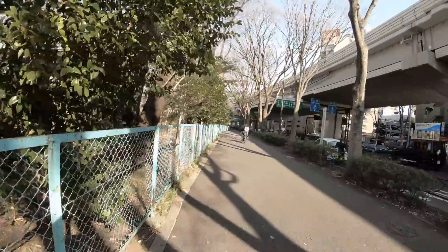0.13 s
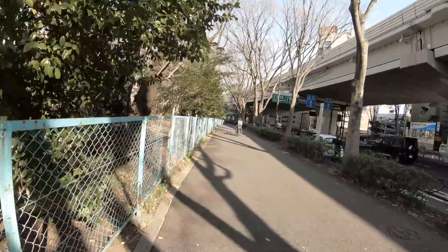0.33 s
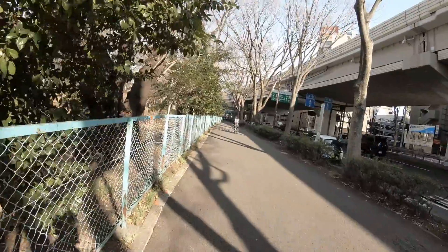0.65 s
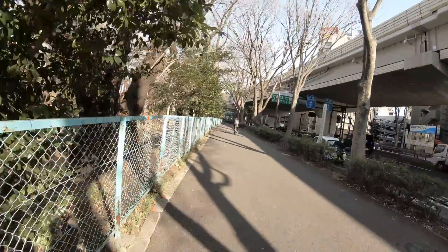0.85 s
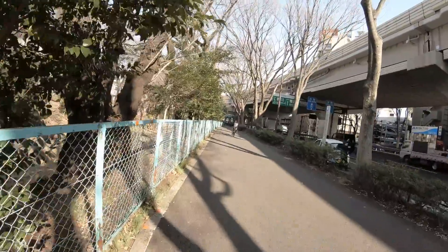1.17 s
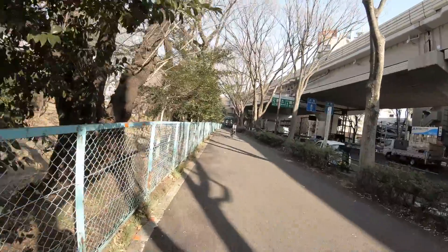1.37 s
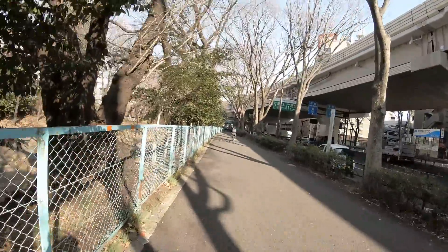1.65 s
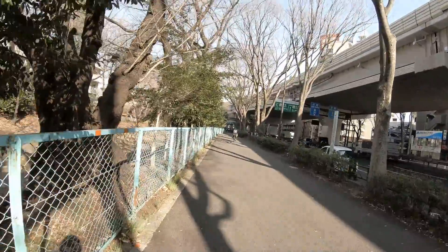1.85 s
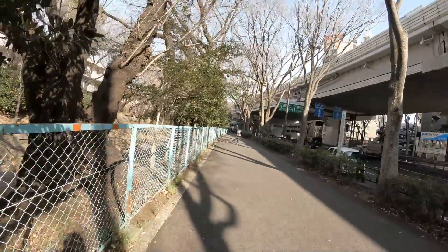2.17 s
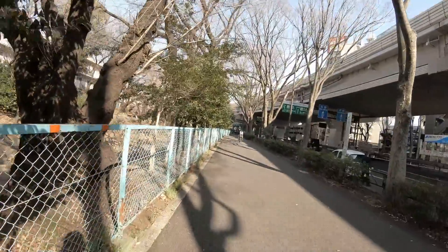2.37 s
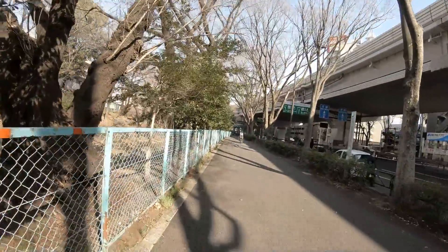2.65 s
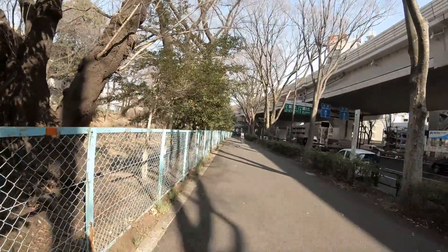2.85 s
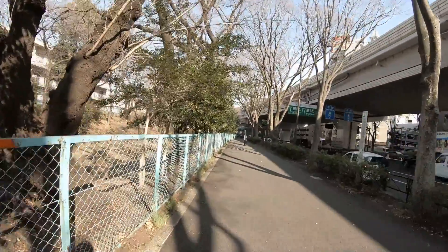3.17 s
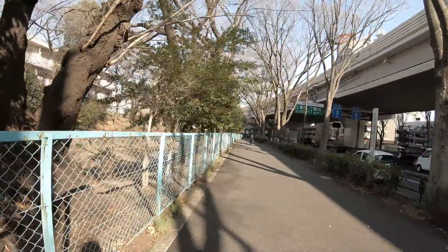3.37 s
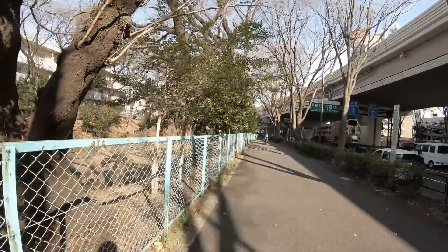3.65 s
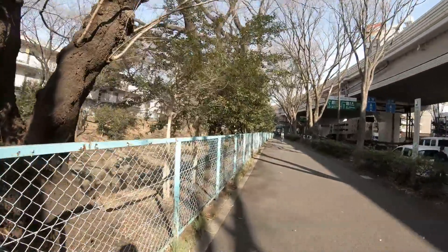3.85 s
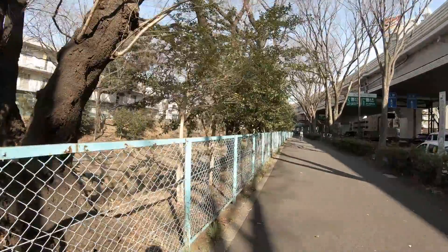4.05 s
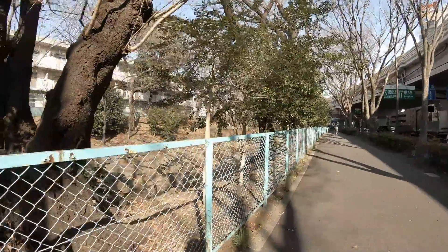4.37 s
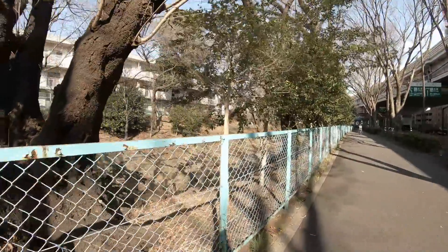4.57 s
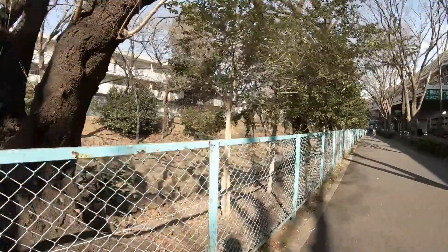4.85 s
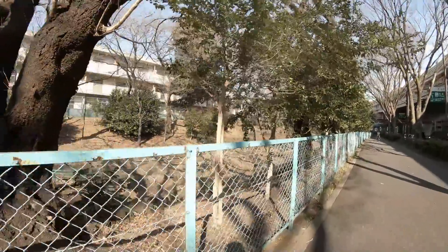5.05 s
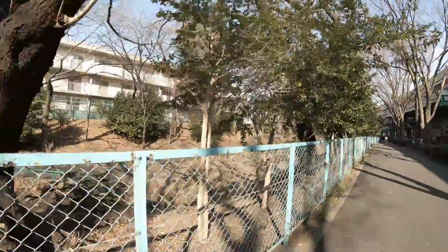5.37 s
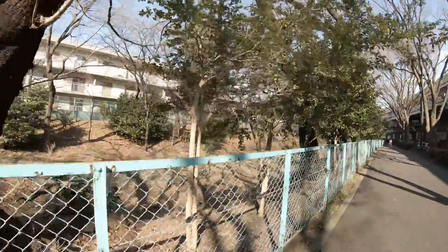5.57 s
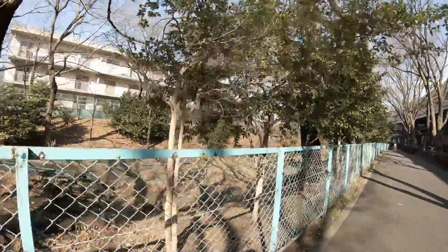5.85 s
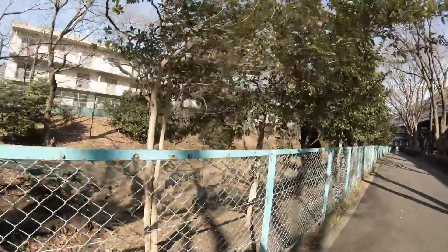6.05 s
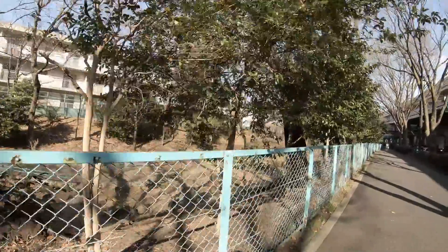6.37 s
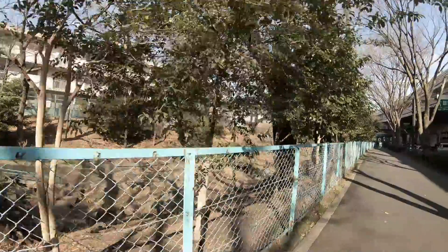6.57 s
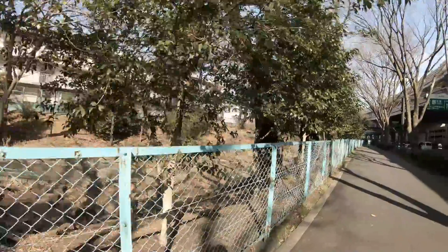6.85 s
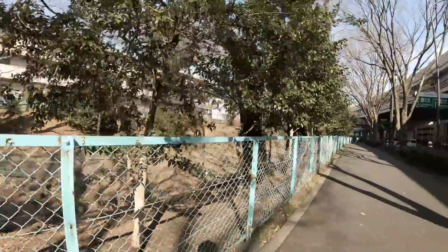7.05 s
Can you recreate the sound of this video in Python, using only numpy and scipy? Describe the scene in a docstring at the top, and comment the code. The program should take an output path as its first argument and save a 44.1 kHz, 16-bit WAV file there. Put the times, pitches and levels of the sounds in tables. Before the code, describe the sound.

Steady heavy traffic heard from a footpath. A deep deck boom and low exhaust roar run throughout, while overlapping passes bring smooth tyre noise and a softer hiss. Low hums waver in and out, one sliding downward near the middle. Traffic eases slightly around four seconds, then swells again towards the end. Very faint dry leaves rustle close to a single fixed-sounding outdoor microphone.

```python
"""A footpath some way off from a busy road and an elevated expressway.
The deck booms and exhausts roar as low noise; tyres roll, wash and hiss as higher noise, swelling with each pass.
Low hums and tones of the road are wavering sines that swell and fade, two sliding down, with one faint whine late on.
Bands of road noise swell and fade around changing pitches. Dry leaves and twigs rustle faintly nearby as
flickering high noise, with small ticks."""
import sys
import numpy as np
from scipy import signal
from scipy.fft import rfft, irfft, next_fast_len
from scipy.io import wavfile
from scipy.ndimage import uniform_filter1d

SR = 44100
rng = np.random.default_rng(int(sys.argv[2]) if len(sys.argv) > 2 else 0)


def wav_out(sig):
    """Save sig, one row per channel (or a flat mono array), as 16-bit PCM at SR to the path in sys.argv[1]."""
    wavfile.write(sys.argv[1], SR, np.round(np.clip(np.atleast_2d(sig).T, -1, 1) * 32767).astype(np.int16))


N = 317961  # length of the scene [samples]


def undb(db):
    """Turn decibels into a gain."""
    return 10 ** (np.asarray(db) / 20)


def along(rows):
    """Draw straight lines between the rows' times, giving each column a value at every sample."""
    s, *columns = np.transpose(rows)
    return [np.interp(np.arange(N) / SR, s, c) for c in columns]


def walk(rate):
    """A smooth random wander: levels held for 1 / rate seconds, then smoothed twice; spread near 1."""
    hold = int(SR / rate)
    steps = np.repeat(rng.standard_normal(N // hold + 1), hold)
    smooth = uniform_filter1d(uniform_filter1d(steps, hold), hold)
    return 1.305 * smooth[:N]  # smoothing shrinks the spread, so scale it back up


def coloured(spectrum):
    """Noise of rms 1, shaped to rows of (pitch [Hz], level per Hz [dB]) and silent outside them."""
    size = next_fast_len(N)
    hz, db = np.transpose(spectrum)
    bin_hz = np.arange(size // 2 + 1) * SR / size
    shape_db = np.interp(np.log(bin_hz + 1e-9), np.log(hz), db, left=-200, right=-200)
    noise = irfft(rfft(rng.standard_normal(size)) * undb(shape_db), size)[:N]
    return noise / np.sqrt(np.mean(noise ** 2))


def tone(hz, db, waver, waver_db, rough_db):
    """A sine whose pitch and strength waver at random, with a faster random roughness in its level."""
    phase = 2 * np.pi * np.cumsum(hz * (1 + waver * walk(9))) / SR
    level_db = db + waver_db * walk(8.6) + rough_db * walk(25)
    start = 2 * np.pi * rng.random()
    return np.sqrt(2) * undb(level_db) * np.sin(phase + start)  # root 2 makes the level an rms level


def rumble():
    """Heavy vehicles boom in the deck and roar from exhausts: low noise whose level drifts slowly."""
    # noise colours: (pitch [Hz], relative level per Hz [dB])
    deck_colour = [(8, -32), (18, -11), (33, -1), (45, 0), (62, 1.5), (74, -1), (84, -17), (100, -33)]
    exhaust_colour = [(60, -36.5), (80, -1.5), (92, -1.5), (120, -1.5), (138, -4), (200, -2), (240, -5.5),
                      (310, -7), (360, -12.5), (430, -16.5), (560, -24), (800, -46)]
    # rumble of heavy vehicles: (time [s], deck level [dB], exhaust level [dB])
    roar = [(0.0, -25, -21), (0.5, -23.5, -21), (1.3, -28, -21.5), (2.0, -23.5, -21.5), (2.7, -25.5, -22),
            (3.2, -27, -23), (3.7, -27.5, -24), (4.1, -26, -23.5), (4.5, -25, -23.5), (5.0, -27, -23),
            (5.5, -26, -22.5), (5.9, -27.5, -22.5), (6.3, -28.5, -22.5), (7.2, -25, -23.5)]
    deck_db, exhaust_db = along(roar)
    deck = undb(deck_db + 0.42 * walk(1.6)) * coloured(deck_colour)
    exhaust = undb(exhaust_db + 0.22 * walk(2.3)) * coloured(exhaust_colour)
    return deck + exhaust


def passing():
    """Gains of tyres, wash and hiss: each pass adds power that falls off with the square of its distance."""
    # nearer vehicles: (time when nearest [s], time to fall to half power [s],
    # tyre level [dB], wash level [dB], hiss level [dB])
    passes = [(0.1, .3, -34.5, -46.5, -52.5), (.75, .5, -35.5, -45, -53), (1.55, 0.32, -32.5, -42, -50.5),
              (2.75, 0.17, -35.5, -51.5, -58.5), (3.15, 0.24, -37, -45, -56.5),
              (3.75, .4, -42.5, -45.5, -54.5), (5.05, 0.32, -38, -42.5, -50.5),
              (5.7, 0.18, -33, -44, -50.5), (6.3, .25, -32, -43.5, -54), (6.52, 0.15, -34, -38, -50.5),
              (7.2, 0.25, -35, -38.5, -50.5)]
    s, half_s, *db = np.transpose(passes)
    late = np.arange(N) / SR - s[:, None]
    near = 1 / (1 + (late / half_s[:, None]) ** 2)
    far = undb([-33, -42.5, -51.5])  # steady blend of far vehicles: tyres, wash, hiss [dB]
    return np.sqrt(far[:, None] ** 2 + undb(db) ** 2 @ near)


def rolling():
    """Many far tyres blend into smooth noise in three bands; nearer vehicles swell out of it."""
    # noise colours: (pitch [Hz], relative level per Hz [dB])
    tyre_colour = [(300, -31.5), (430, -5), (550, -0.5), (650, -1), (830, 0.5), (960, -1.5), (1250, -4),
                   (1500, -13.5), (2000, -33)]
    wash_colour = [(1000, -26), (1400, -1.5), (1650, -0.5), (1900, -2.5), (2300, -8), (2900, -19.5),
                   (3800, -39)]
    hiss_colour = [(1800, -28), (2500, -1), (2900, -0.5), (3800, -5), (4450, -8), (4900, -13),
                   (5300, -19.5), (5900, -26), (7000, -48)]
    tyre_gain, wash_gain, hiss_gain = passing()
    tyres = tyre_gain * undb(0.36 * walk(6.7)) * coloured(tyre_colour)
    wash = wash_gain * undb(0.48 * walk(8.1)) * coloured(wash_colour)
    hiss = hiss_gain * undb(0.29 * walk(6.8)) * coloured(hiss_colour)
    return tyres + wash + hiss


def road_hums():
    """Each tone swells and fades; its pitch slides fastest at its peak; higher tones are more broken."""
    # low hums and tones of the road, with one faint whine: (time of the peak [s], length [s],
    # pitch [Hz], whole slide in pitch [Hz], level at the peak [dB])
    hums = [(0.25, 0.59, 158.2, -1.5, -29), (0.15, 0.47, 125, 2, -32.5), (0.3, 1, 52.9, -1, -26.5),
            (1.0, 1.12, 119.5, 5, -30.5), (.6, .9, 228, 4, -33.5), (2.9, 0.55, 36, 1, -29),
            (1.298, 0.66, 186, 2.5, -31), (1.75, 0.37, 202, 0, -33), (2.2, 0.4, 190, 0, -29.5),
            (2.35, 0.45, 67.4, -0.5, -29), (3.498, 0.86, 55, 2, -27), (4.597, 0.82, 187.1, -3, -31.5),
            (6.25, 0.64, 57.7, -2, -23), (6.997, .6, 175, -3, -31.5), (0.65, 0.6, 206, 0, -31.5),
            (0.7, 0.76, 66.3, -5, -31.5), (0.803, 0.62, 44.45, 0.5, -28), (1.0, 0.42, 202, 0.5, -30),
            (1.3, .4, 200, 0.5, -28.5), (1.548, 1.4, 53.0, -1, -24), (1.8, 0.63, 159.6, 0, -31),
            (1.9, 1.26, 64.9, 6, -29.5), (2.35, 1.7, 45.2, 0, -25.5), (2.6, 0.55, 99.5, 0, -29),
            (2.8, 0.59, 63.0, 3, -26.5), (3.198, 1.2, 54.6, -0.5, -31), (3.8, 1.02, 109.1, -29, -23.5),
            (4, 0.65, 48.6, -1.5, -26.5), (4.4, 0.45, 121.8, 1, -27.5), (4.7, 0.8, 44.4, 0, -27.5),
            (4.75, 0.93, 25.3, 0, -28.5), (5.1, 0.7, 61.3, 0, -25.5), (5.503, 1.27, 89.1, 2, -26),
            (5.7, 0.76, 57.9, 3.5, -23.5), (5.75, 0.26, 249.9, -0.5, -27), (6.192, 0.74, 222.6, -24.5, -34),
            (6.4, 1.15, 116.2, 0, -30.5), (6.45, 0.5, 980, 1, -45), (6.502, 1.3, 45.0, 0, -25),
            (6.55, 0.44, 181.6, 0, -30), (6.905, 0.62, 94.2, -3.5, -27.5), (7.1, 0.89, 57.5, 2, -24)]
    out = 0
    for s, length, hz, slide_hz, db in hums:
        turn = np.pi * np.clip((np.arange(N) / SR - s) / length, -.5, .5)
        pitch = hz + slide_hz * np.sin(turn) / 2
        waver = .009 * np.sqrt(min(hz, 250) / 100)  # share of the pitch, growing up to 250 Hz
        rough_db = 1.1 * np.sqrt(hz / 100)
        out = out + np.cos(turn) * tone(pitch, db, waver=waver, waver_db=1.0, rough_db=rough_db)
    return out


def coloured_swells():
    """Bands of road noise swell and fade around changing pitches: each is filtered noise with its own peak."""
    # coloured swells: (time when loudest [s], time to fall to half power [s], pitch [Hz], level [dB])
    swells = [(.8, .5, 1403, -43), (1.52, .35, 1010, -37.5), (2.6, .7, 720, -39), (2.7, .1, 1296, -40.5),
              (3.05, .25, 1416, -40), (4.3, .15, 622, -40), (4.75, .12, 980, -37.5), (5.13, .12, 897, -36),
              (4.4, .4, 1340, -43.5), (3.3, .3, 2450, -51.5), (5.75, .15, 2600, -50.5),
              (5.1, 0.17, 1500, -44), (.65, .35, 400, -38), (1.7, .2, 400, -38), (2.6, .15, 330, -36),
              (4.9, 0.14, 400, -38), (5.25, 0.18, 300, -34.5), (5.55, 0.11, 400, -35.5),
              (6.0, .15, 400, -37.5), (5.95, .12, 820, -39), (4.9, 0.37, 2350, -51.5),
              (6.48, .1, 1000, -37.5), (6.35, .3, 1097, -37.5), (6.52, 0.11, 1890, -42.5),
              (6.65, .1, 1590, -41.5), (7.05, .12, 946, -36)]
    width = .17  # step between points of the band, as a share of the pitch
    t, out = np.arange(N) / SR, 0
    for s, half_s, hz, db in swells:
        band = [(hz * (1 + width) ** k, -6 * k ** 2) for k in range(-2, 3)]
        swell = 1 / np.sqrt(1 + ((t - s) / half_s) ** 4)
        out = out + undb(db) * coloured(band) * swell
    return out


def trees():
    """Leaves and twigs rustle together, flickering quickly; a tick is a soft short burst of twig noise."""
    # noise colours: (pitch [Hz], relative level per Hz [dB])
    leaf_colour = [(5000, -21.5), (6000, -3.5), (6600, -2), (7600, -0.5), (8100, -0.5), (8800, -6),
                   (9500, -12), (10300, -32)]
    twig_colour = [(9000, -20), (9900, -5), (10900, 0), (11500, -1), (12400, -3), (13200, -8), (13700, -14),
                   (14900, -26)]
    # breeze in the trees: (time [s], leaf level [dB], twig level [dB])
    breeze = [(0.0, -69.5, -83.5), (1.0, -69.5, -82), (1.6, -67.5, -81), (2.2, -70, -84),
              (2.48, -69.5, -82), (2.56, -70, -76.5), (2.61, -69.5, -76.5), (2.65, -70, -82),
              (3.4, -70, -81), (3.85, -68.5, -78.5), (4.1, -71, -79.5), (4.6, -67.5, -77.5),
              (5.15, -67, -77), (5.4, -68, -80), (5.9, -69.5, -81.5), (6.4, -69.5, -82), (7.2, -71, -84)]
    # small dry ticks among the twigs: (start time [s], level before the fade [dB])
    tick_list = [(1.4731, -77.5), (2.19, -81), (4.4594, -77), (5.1013, -79), (5.2094, -77.5), (6.6194, -80)]
    attack_s, decay_s = .004, .015
    leaves_db, twigs_db = along(breeze)
    flicker, sway = walk(30), walk(6)
    s, db = np.transpose(tick_list)
    late = np.arange(N) / SR - s[:, None]
    rise = np.clip(late / attack_s, 0, 1)
    fade = np.exp(-np.abs(late) / decay_s)
    ticks = undb(db) @ (rise * fade)
    leaves = undb(leaves_db + .4 * flicker + .3 * sway) * coloured(leaf_colour)
    twigs = (undb(twigs_db + .8 * flicker + .4 * sway) + ticks) * coloured(twig_colour)
    return leaves + twigs


def scene():
    """Everything added up at one microphone."""
    return (rumble() + rolling() + road_hums() + coloured_swells() + trees())[None]


def record(dry):
    """The recorder rounds the loudest peaks and cuts the top; already running, its filter starts settled."""
    top_hz = 14900
    sos = signal.ellip(8, .2, 70, top_hz, fs=SR, output="sos")  # .2 dB ripple, 70 dB cut
    rounded = np.tanh(0.9 * dry[0]) / 0.9
    settled = signal.sosfilt_zi(sos) * rounded[0]
    return signal.sosfilt(sos, rounded, zi=settled)[0][None]


dry = scene()
out = record(dry)
wav_out(out)
```